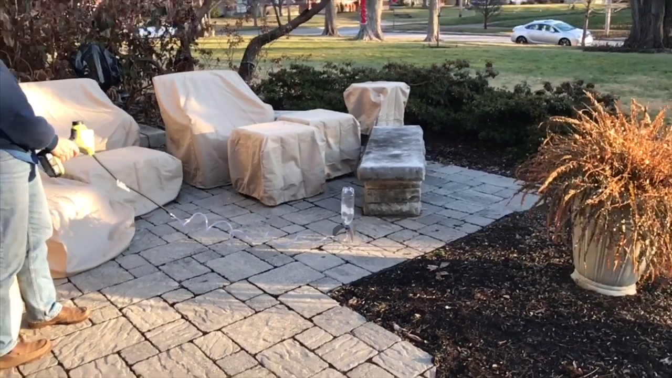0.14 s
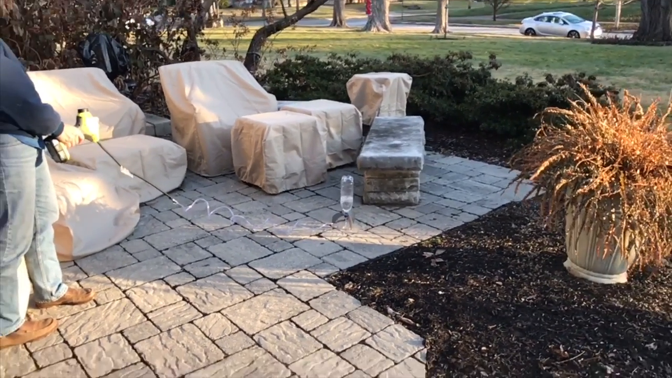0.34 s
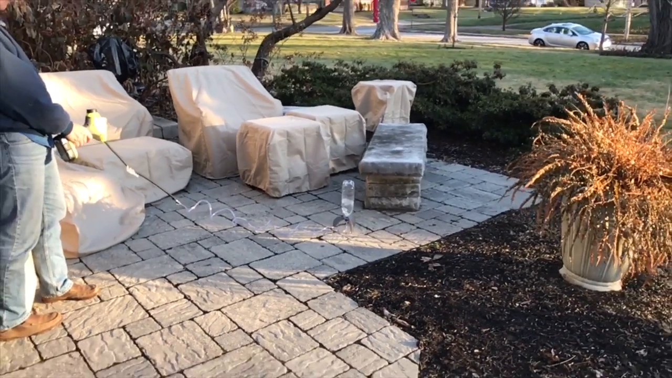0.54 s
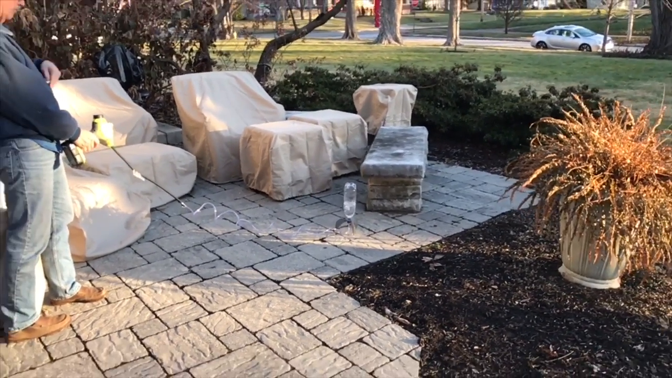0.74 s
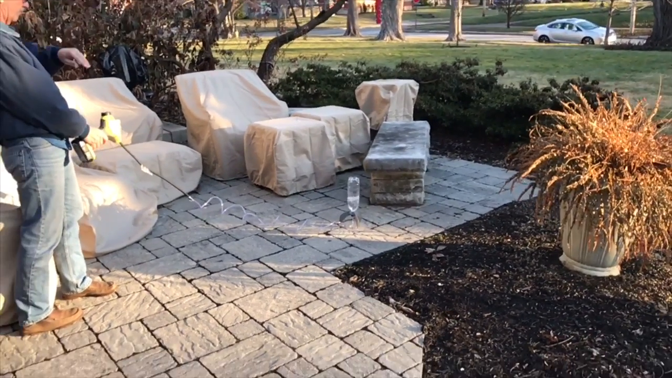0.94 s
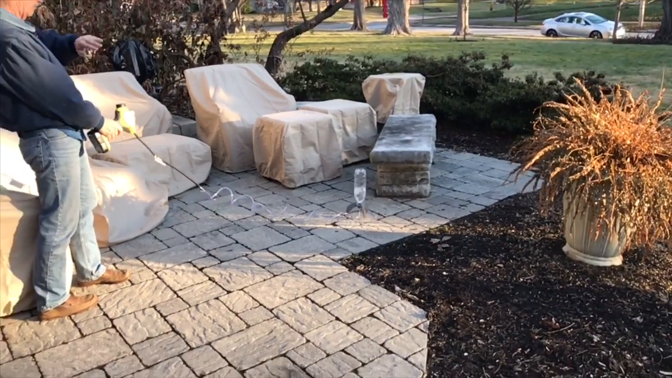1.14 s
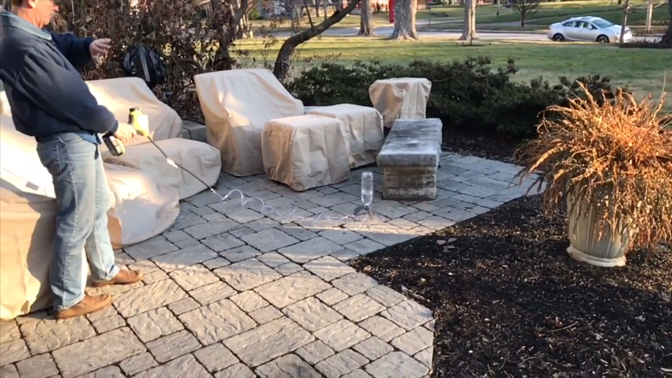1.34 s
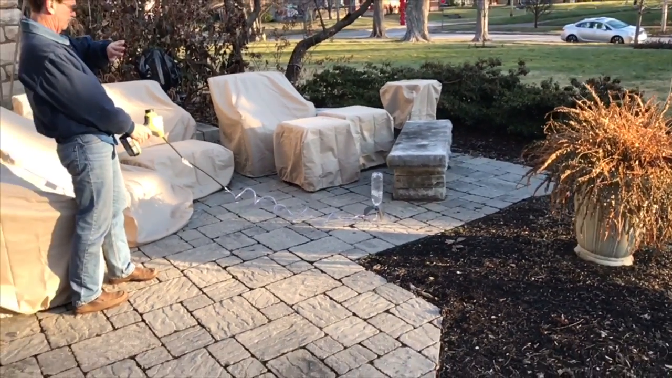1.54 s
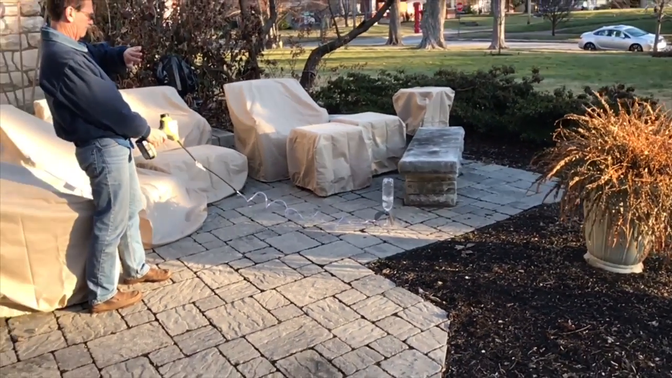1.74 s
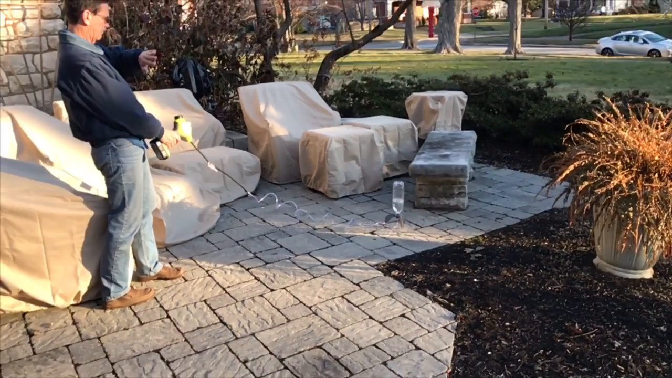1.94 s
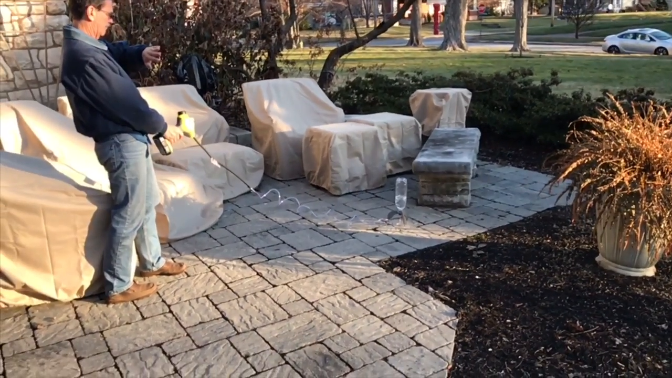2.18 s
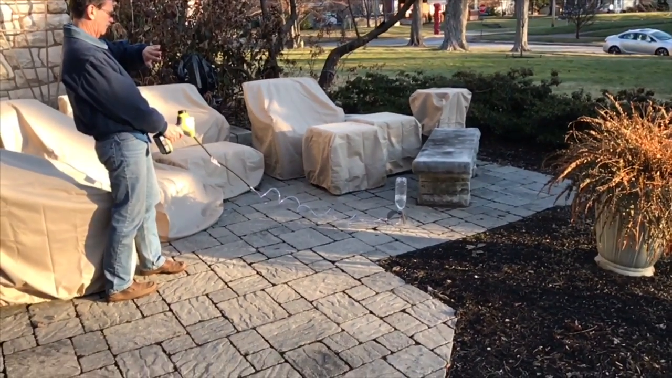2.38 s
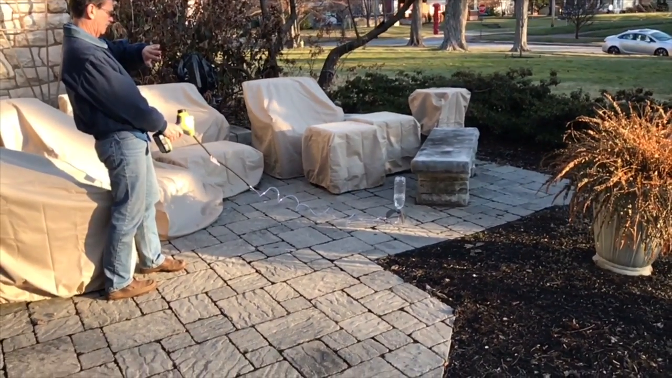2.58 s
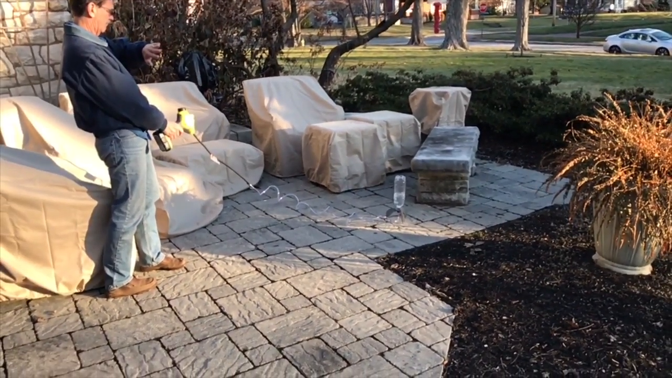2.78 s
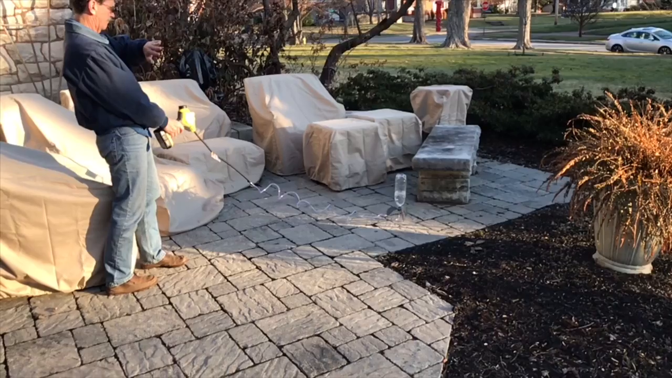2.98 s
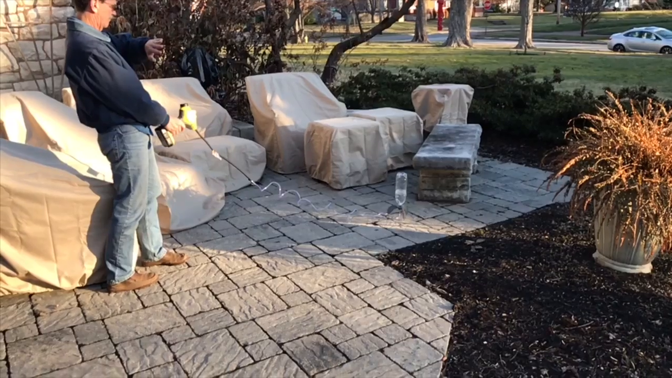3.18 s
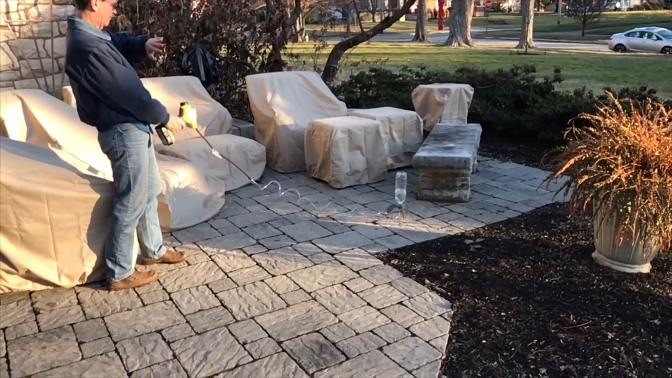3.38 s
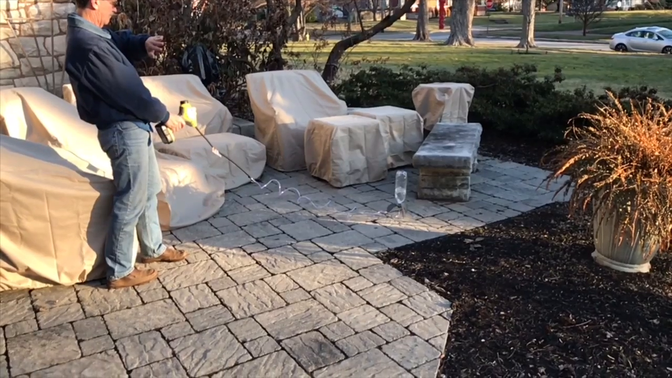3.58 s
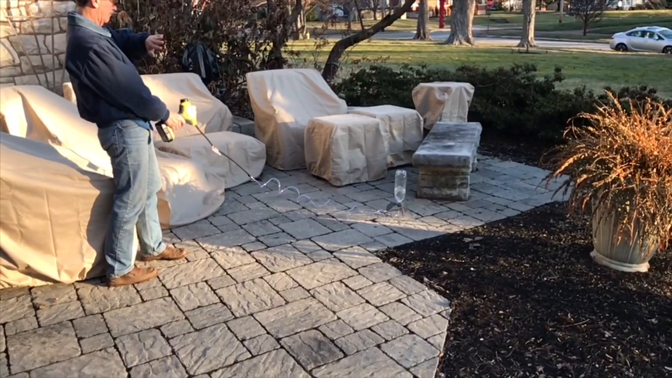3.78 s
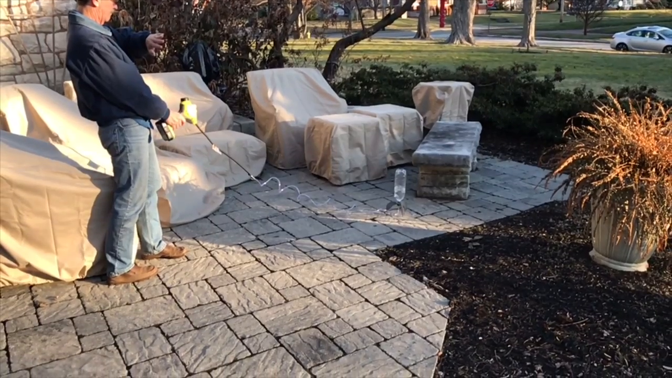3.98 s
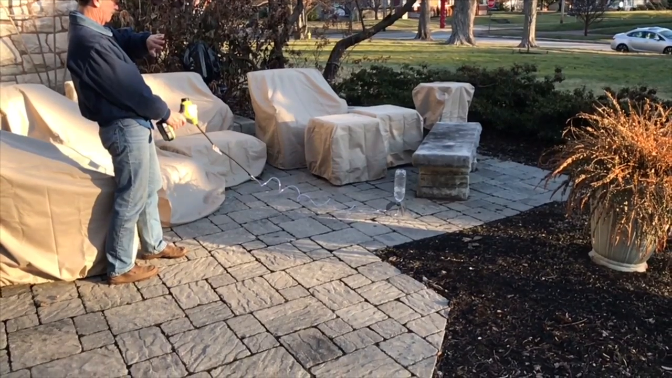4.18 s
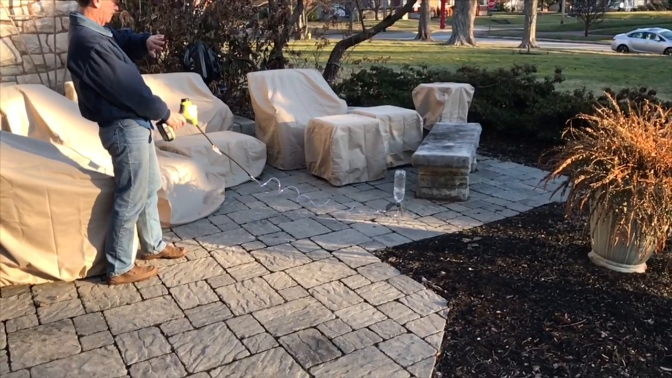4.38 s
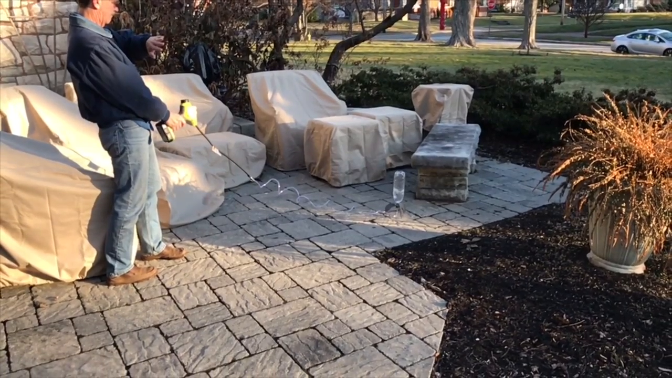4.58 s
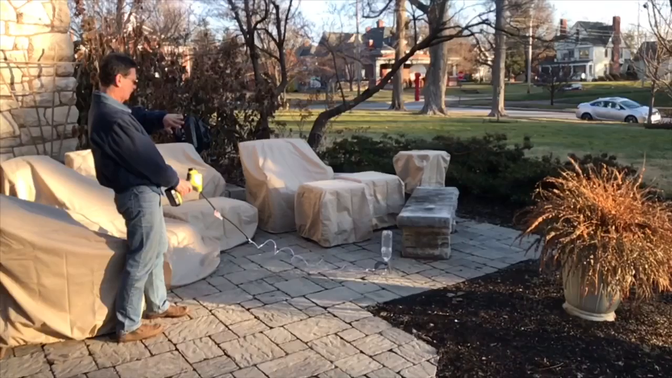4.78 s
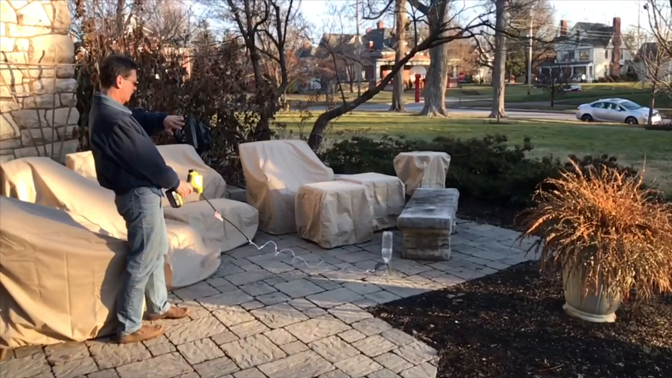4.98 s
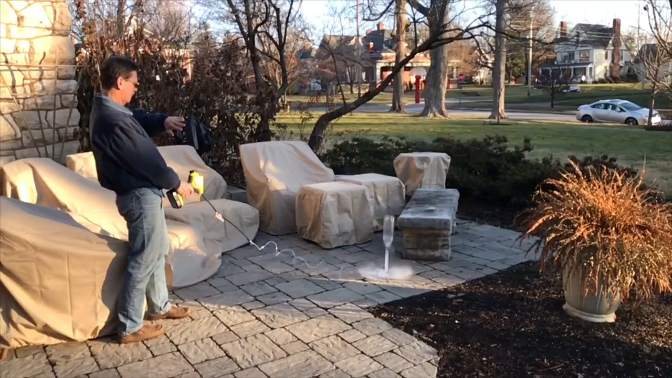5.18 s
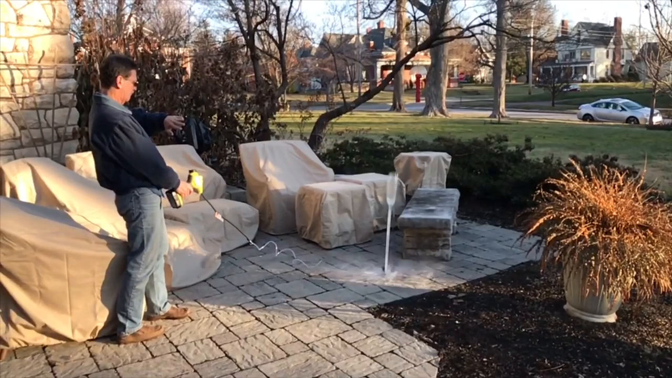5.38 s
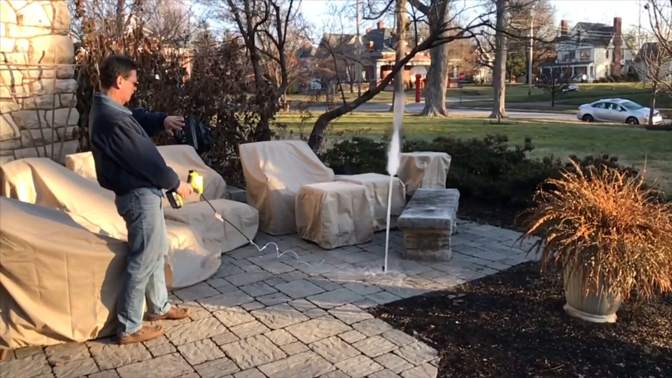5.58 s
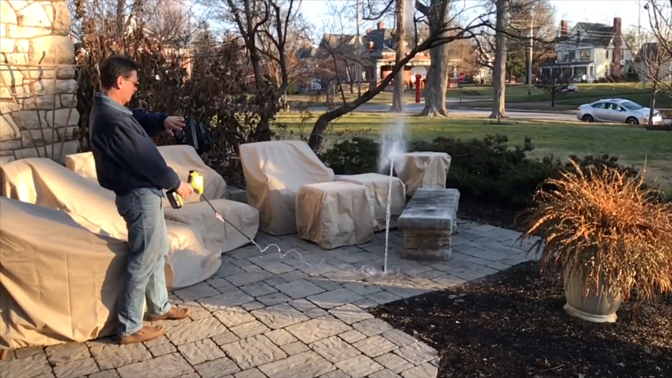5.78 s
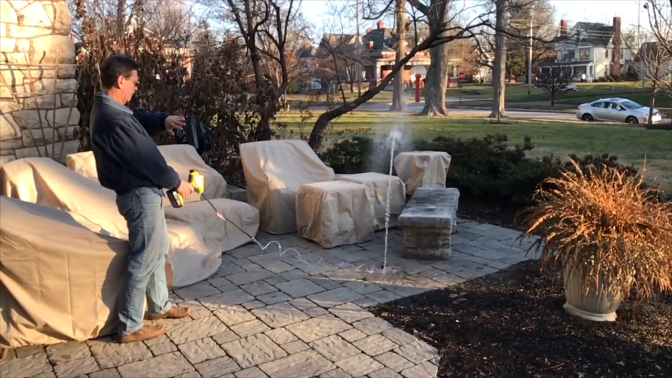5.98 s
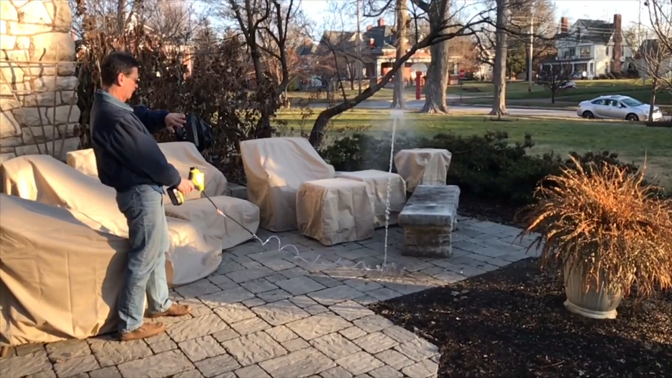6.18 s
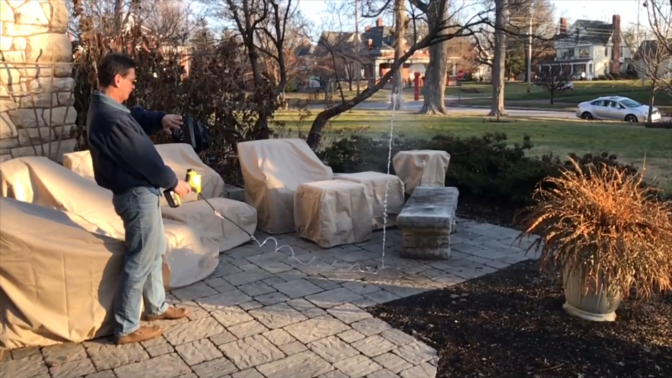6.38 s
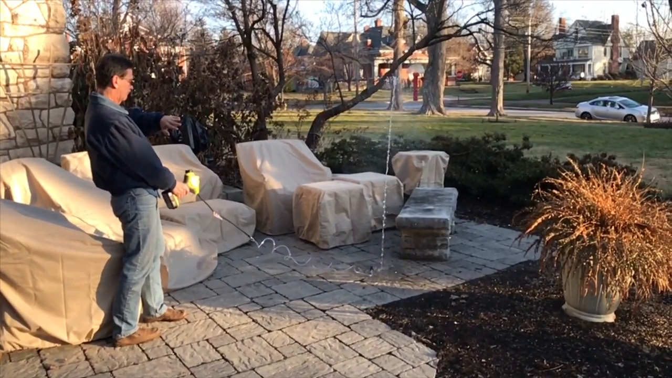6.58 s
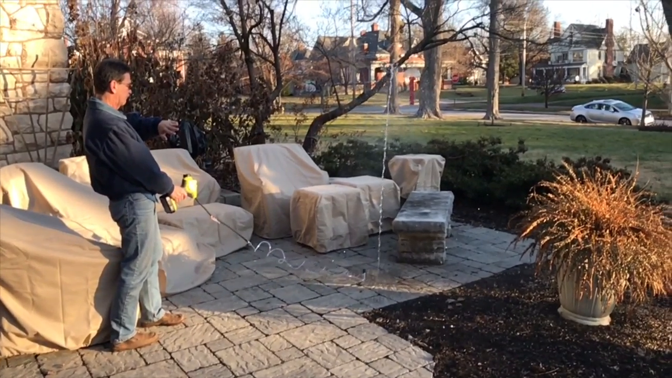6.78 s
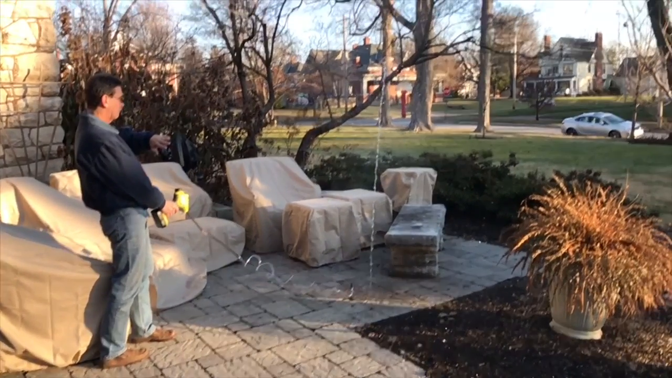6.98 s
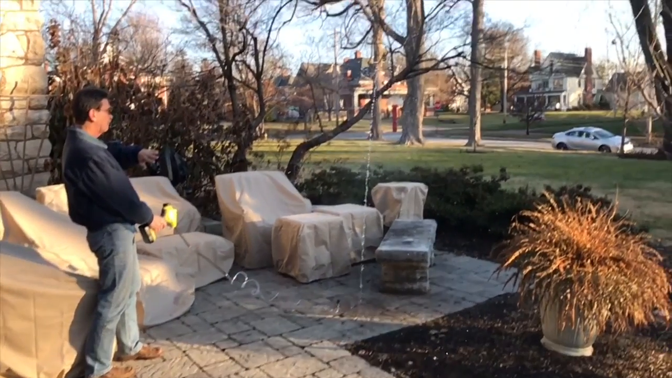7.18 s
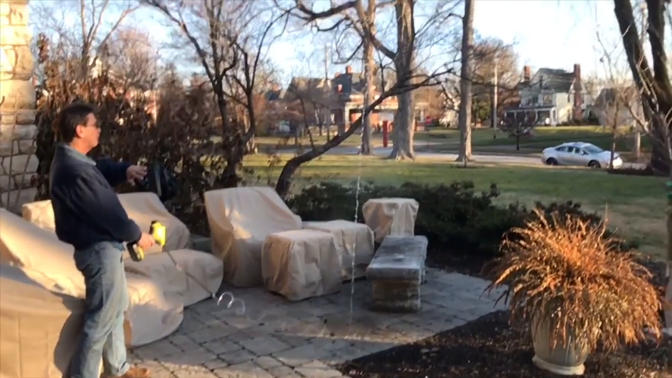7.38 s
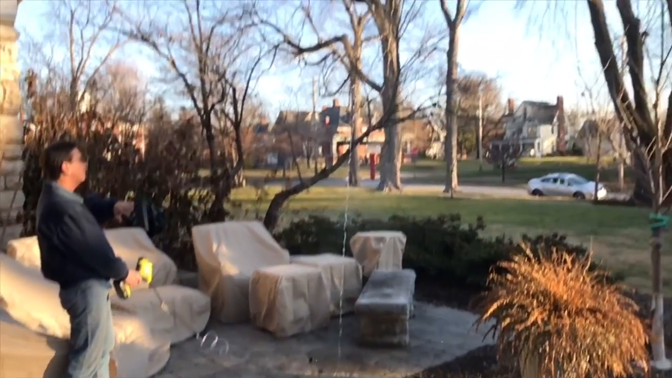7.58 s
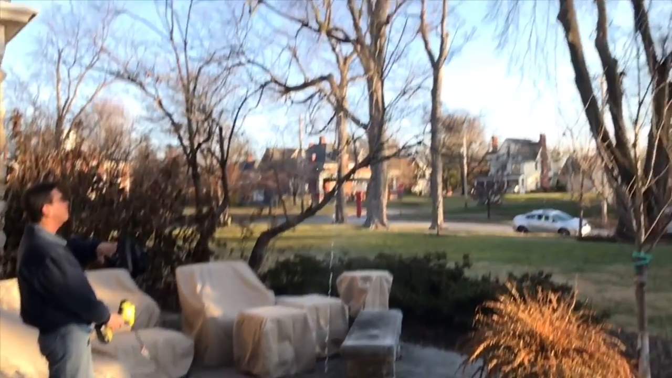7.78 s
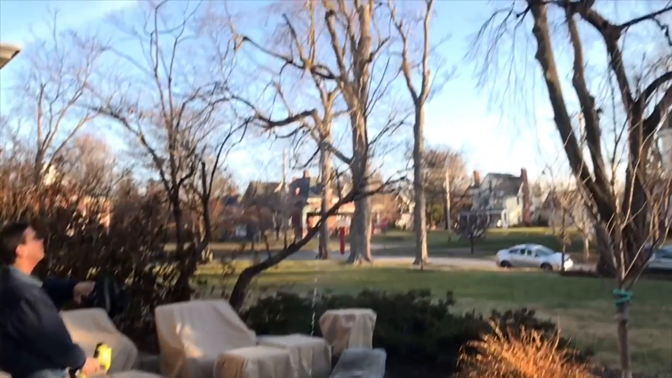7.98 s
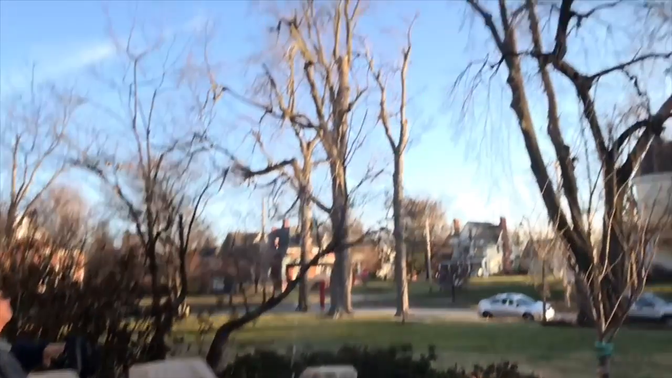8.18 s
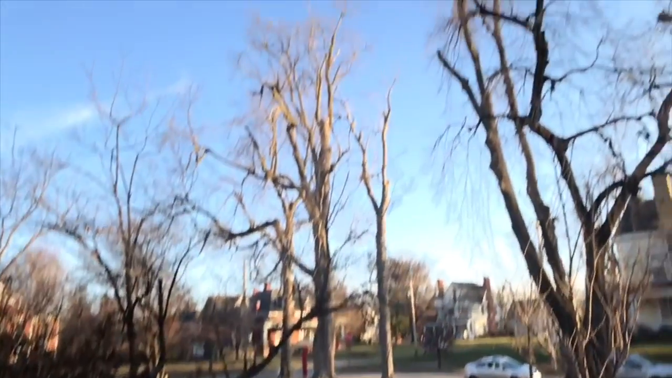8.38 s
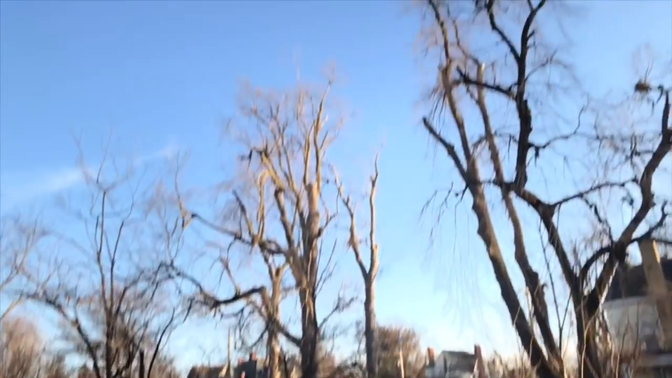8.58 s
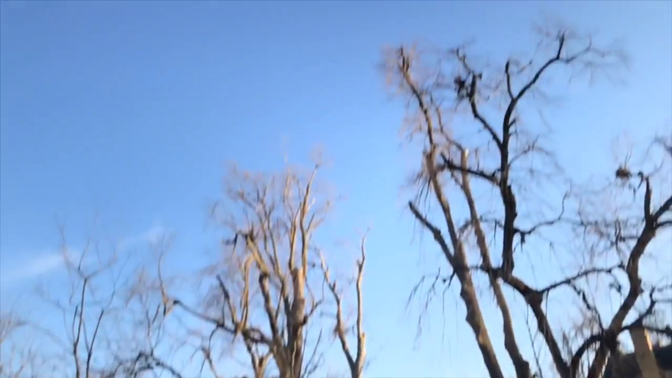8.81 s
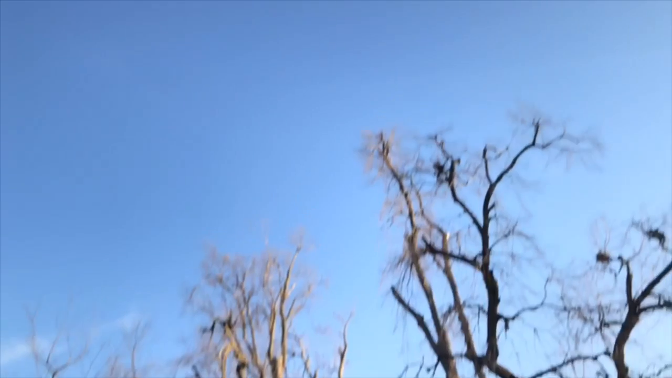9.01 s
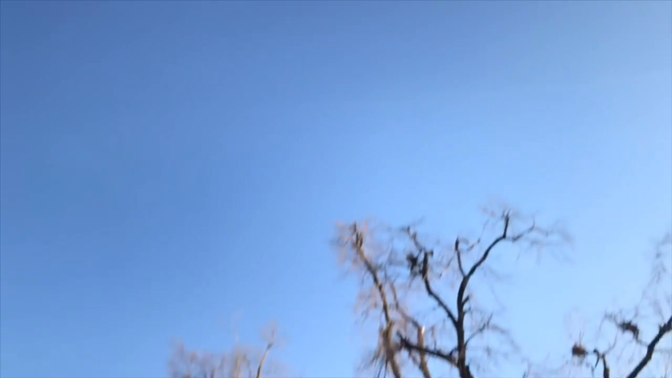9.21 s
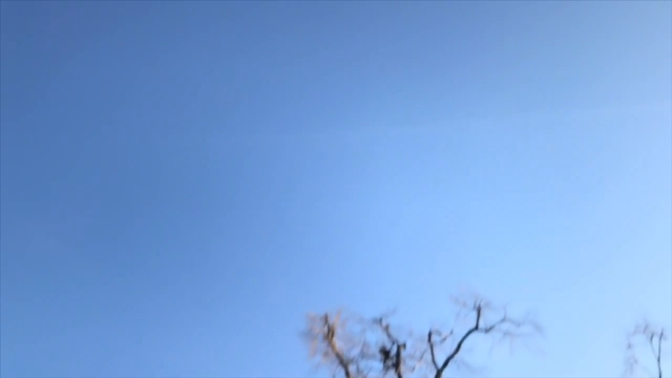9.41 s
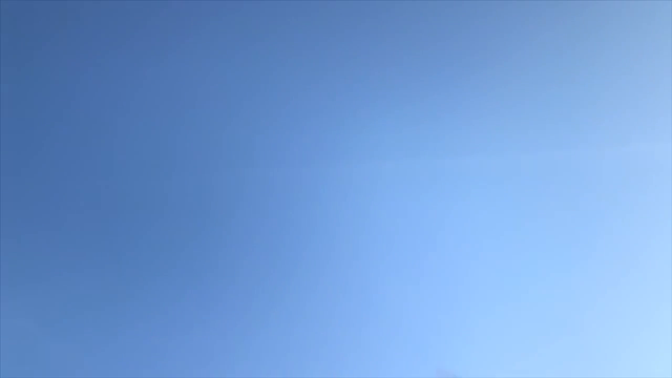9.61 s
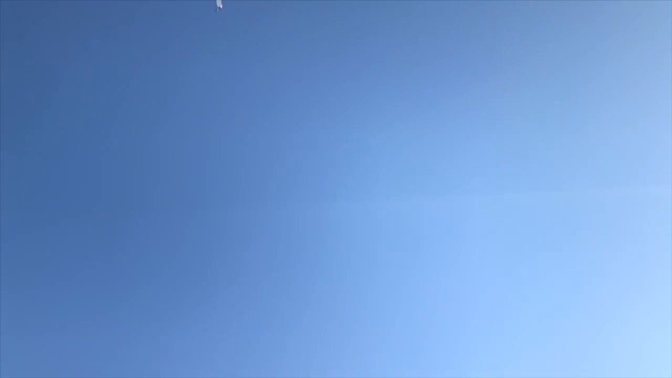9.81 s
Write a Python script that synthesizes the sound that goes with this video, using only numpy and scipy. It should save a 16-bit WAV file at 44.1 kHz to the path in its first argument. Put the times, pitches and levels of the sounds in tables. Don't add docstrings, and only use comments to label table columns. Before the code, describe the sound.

From 0 to about 1.75 seconds a hand-held piston air pump runs very near the microphone on an outdoor patio: a harsh, rapid rattling buzz at roughly sixty strokes a second, with metallic knocks, bright valve hiss and a thin reedy whistle; its tone turns duller around 1 second. Between 1.8 and 2.3 seconds playback brakes in tiny steps and everything slides down three octaves to a dark, grainy throb of about eight pulses a second, with a low strained whine. At 4.7 the sound dips briefly for a scene change, then the throb resumes. At 5.4 a bottle rocket releases in slow motion: abrupt deep pops and a loud muffled gush with spray, sagging by 5.8; a weaker sputter comes near 5.9 to 6.1, with faint late thuds to 6.8. The throb carries on, slowing and fading from 8.7 until 9.85.

```python
import sys
import numpy as np
from scipy import signal
from scipy.fft import rfft, irfft
from scipy.io import wavfile
from scipy.ndimage import uniform_filter1d, map_coordinates

SR = 44100
rng = np.random.default_rng(int(sys.argv[2]) if len(sys.argv) > 2 else 0)


def makeup_ratio(level_db):
    decades = np.asarray(level_db, float) / 20
    return 10 ** decades


def output_pcm(signal):
    pcm = np.clip(np.atleast_2d(signal).T, -1, 1) * 32767
    wavfile.write(sys.argv[1], SR, np.round(pcm).astype(np.int16))


N = 434385
M = 3 * SR + 4096

# (true pitch [Hz], width [Hz], knock level [dB],
# rush level [dB], crank angle of loudest rush [turns], rush swing [dB])
CASING_MODES = [(70, 110, -9.5, -23.5, 0.088, -17.5), (127, 15, -4.5, -23, 0.27, -7),
                (250, 110, -8.5, -25.5, .4, 14.5), (435.6, 50, -2, -19.5, 0.2, -2.5),
                (517, 44, 6.5, -6, .15, -4.5), (626, 59, -14.5, -19, .2, 5.5),
                (760, 160, -2.5, -15, .8, -4.5), (911, 170, 2.5, 0.5, .08, 0.5),
                (1275, 130, -1, 2, .03, -6), (1375, 150, -5.5, -2, .1, 4), (1605, 300, -5, 3, 0.18, 0),
                (2017, 220, -7.5, -5, .12, 3)]
# (.. [Hz, Hz, dB, dB, turns, dB])
HEAD_MODES = [(2435, 220, -7, -6.5, .1, 4.7), (2652, 330, -6.5, -2.5, .15, 1),
              (3150, 550, -9.5, -2.5, 0.87, 1), (4060, 560, -11, -2, 0.84, 1.7),
              (4700, 760, -15.5, -5.5, .2, 0.8), (6090, 800, -14.5, -5, .05, 1)]
# (.. [Hz, Hz, dB, dB, turns, dB])
VALVE_MODES = [(7110, 400, -17.5, -0.5, 0.14, 2.9), (8620, 560, -12, 3.5, 0.024, 3.7),
               (8794, 140, -13.5, -1, .02, 3.9), (9180, 350, -15, -6, 0.083, 3),
               (9810, 650, -21, -4, 0.1, 3), (11120, 250, -7, -2.5, .85, 4.6)]
# (.. [Hz, Hz, dB, dB, turns, dB])
VENT_MODES = [(11460, 530, -20, -5.5, 1, 2.2), (12760, 2200, -13.5, -1, 0.98, 0.8),
              (14890, 1900, -23.5, -8.5, 0.16, 2), (16160, 1200, -21, 0.5, 0, 2),
              (17820, 1000, -6.5, 2, 0.00015, 2.5)]
# (.. [Hz, Hz, dB, dB, turns, dB])
GEAR_MODES = [(5530, 200, -12, 0.91, 0.81, 7)]
# (level [dB], share of the distance loss [ratio], lean per grip tilt [dB per dB])
PART_LEVELS = [
    (-35.5, 1.1, 0),
    (-38, .8, 0.02),
    (-38, 0.89, 0.12),
    (-38.5, 0.92, -0.16),
]
# (time heard [s], speed [turns per true s])
CRANK_SPEED = [(0, 62.67), (1.1, 62.63), (1.75, 61.68), (2.3, 61.53), (4.68, 62.13), (4.69, 59.77),
               (5.5, 60.27), (6, 62.01), (6.9, 64.08), (8.6, 63.87), (8.95, 58.03), (9.85, 37.7)]
# (time heard [s], colour tilt about 1.3 kHz [dB per octave])
GRIP_TILT = [(0, 7), (.75, 8), (1.1, 0), (1.5, -2), (4.65, -2.5), (4.72, 0), (6.5, 0), (8.3, 4.5),
             (9.85, 0)]
# (time heard [s], level [dB])
CAMERA_AWAY = [(0, 0.5), (4.7, 1), (5.4, -1), (6, -1.5), (6.6, -1.5), (7.8, 0), (8.6, -0.5), (9, -4),
               (9.3, -7), (9.85, -12)]
# (true pitch [Hz], level [dB])
PATIO_AIR = [(30, -35), (50, -3), (120, -8.5), (300, -11.5), (1000, -12.5), (4000, -26.5), (18000, -29)]
# (time heard [s], gush level [dB], spray level [dB], attack [heard s], hold [heard
# s]) with attack and hold on the same slowed clock as the time heard
WATER_SURGES = [(5.434, -21.5, -26, 0.0026, 0.039), (5.482, -19.5, -24, 0.0012, .085),
                (5.62, -29.5, -33.5, .02, .06), (5.72, -28.5, -33.5, .015, .05),
                (5.907, -29.5, -35.5, 0.025, 0.059), (5.965, -23.5, -32.5, .025, 0.054),
                (6.036, -35, -28, .02, 0.027)]
# (true pitch [Hz], level [dB])
GUSH_COLOUR = [(120, -18.5), (300, -7.5), (700, -5), (1300, 2), (2000, -6), (2900, -3), (4200, -7.5),
               (6000, -34)]
# (true pitch [Hz], level [dB])
SPRAY_COLOUR = [(2500, -19.5), (4500, -5.5), (8000, -3.5), (10500, -8.5), (12500, -4), (18500, -8.5)]
# (time heard [s], level [dB], true pitch [Hz], 60 dB decay [true ms], push +1 or pull -1 first [sign])
AIR_SLUGS = [(5.4405, 1, 800, 6, 1), (5.4612, 5, 1150, 7, -1), (5.4811, 0, 1430, 5, -1),
             (5.4885, -2, 3000, 3, 1), (5.5222, -1, 1400, 5, -1), (5.551, -6, 1400, 6, -1),
             (5.9143, -8, 1600, 4, 1), (5.923, -8, 1400, 6, -1), (6.0258, -5, 1600, 4, -1),
             (5.455, -19, 300, 40, -1), (5.4885, -10, 13000, 1, 1), (5.897, -14, 2500, 3, 1),
             (5.748, -12, 1200, 6, 1), (6.085, -17, 72, 80, -1), (6.205, -24, 250, 20, 1),
             (6.674, -16, 9000, 1.5, 1), (6.72, -25, 1400, 30, 1), (6.77, -24, 1500, 12, 1)]

CRANK_HZ = 62.5
START_TURNS, EDIT_SKIP_TURNS = .03, -.1
EDIT_S, EDIT_HALF_S = 4.683, .03
BRAKE_S, FRAME_S, SLOW, EASE_LAG_FRAMES, EASE_FRAMES = 1.762, 1 / 30, 8, .4, 15.9
MICROPHONE_TOP_HZ, EXPORT_TOP_HZ = 18460, 15680
AIR_DB = -49
COLD_HEAD_DB, SEAT_S = 4, 0.392
GEAR_IDLE_DB, GEAR_STRAINED_DB, GEAR_LATE_DB, STRAIN_FROM_S, STRAIN_FULL_S = -47.5, -40.5, -48.5, 1.63, 2.1
REED_SLACK_HZ, REED_TIGHT_HZ, REED_LATE_HZ, TIGHTEN_FROM_S, TIGHTEN_TO_S = 5477, 5720, 5700, .85, 1.25
REED_DB, REED_LATE_DB, REED_CREEP_HZ_S = -49, -57.5, 70.1
SAG_DB_S, RELEASE_DB_S, STREAM_DB, STREAM_DB_S = 34, 169.5, -8, 27
SPLASH_DB, SPLASH_S = 8.5, .008


def level(x, db):
    return x * makeup_ratio(db) / np.sqrt(np.mean(x ** 2))


def ring(x, hz, width):
    return signal.lfilter(*signal.iirpeak(hz, hz / width, SR), x)


def walk(rate):
    k = int(SR / rate)
    steps = np.repeat(rng.standard_normal(M // k + 1), k)
    return 1.3 * uniform_filter1d(uniform_filter1d(steps, k), k)[:M]


def coloured(x, points):
    hz, db = np.transpose(points)
    f = np.arange(M // 2 + 1) * SR / M
    gain = makeup_ratio(np.interp(np.log(f + 1), np.log(hz), db, left=-60))
    return level(irfft(rfft(x) * gain, M), 0)


def true_time():
    frame = (np.arange(N) / SR - BRAKE_S) // FRAME_S
    u = np.clip((frame - EASE_LAG_FRAMES) / EASE_FRAMES, 0, 1)
    speed = SLOW ** -(u * u * (3 - 2 * u))
    return np.cumsum(speed) / SR


def knocks(turns, scatter_db, jitter):
    chance = rng.standard_normal((256, 2))
    whole = np.arange(1, int(turns[-1]))
    at = np.interp(whole + jitter * chance[whole, 0], turns, np.arange(M - 1))
    size = makeup_ratio(scatter_db * chance[whole, 1]) * np.sqrt(SR / CRANK_HZ)
    out = np.zeros(M)
    out[at.astype(int)] += size * (1 - at % 1)
    out[at.astype(int) + 1] += size * (at % 1)
    return out


def clatter(turns, hold_turns):
    steps = int(SR / CRANK_HZ)
    patterns = rng.standard_normal((64, steps))
    where = [(turns + 4) / hold_turns, turns % 1 * steps]
    return level(map_coordinates(patterns, where, order=1, mode="grid-wrap"), 0)


def pump_part(modes, turns, scatter_db, jitter, flicker_db, repeat, tilt_db=0, pivot_hz=1300):
    out = 0
    worn = np.sqrt(repeat) * clatter(turns, 14.0)
    for k, (hz, width, knock_db, rush_db, angle, swing_db) in enumerate(modes):
        stroke_db = swing_db * np.cos(2 * np.pi * (turns - angle))
        stroke_db = stroke_db + flicker_db * walk(250) + 0.34 * walk(4.8)
        rush = worn + np.sqrt(1 - repeat) * rng.standard_normal(M)
        drive = makeup_ratio(rush_db + stroke_db) * rush
        drive = drive + (-1) ** k * makeup_ratio(knock_db) * knocks(turns[:-1] - angle, scatter_db, jitter)
        octaves = np.log2(hz / pivot_hz if hz > 650 else 1)
        drive = drive * makeup_ratio(tilt_db * octaves)
        out = out + ring(ring(drive, hz, 1.76 * width), hz, 1.76 * width)
    return level(out, 0)


def reed(heard, turns, late, away_db):
    tight_hz = np.interp(heard, [TIGHTEN_FROM_S, TIGHTEN_TO_S], [REED_SLACK_HZ, REED_TIGHT_HZ])
    creep_hz = REED_CREEP_HZ_S * np.maximum(heard - BRAKE_S, 0)
    hz = np.where(late, REED_LATE_HZ, tight_hz + creep_hz)
    phase = 2 * np.pi * np.cumsum(hz * (1 + 0.0065 * walk(120))) / SR
    stroke_db = 5.0 * np.cos(2 * np.pi * (turns - .97)) + 2.7 * walk(90)
    return makeup_ratio(np.where(late, REED_LATE_DB + away_db, REED_DB) + stroke_db) * np.sin(phase)


def pump(heard):
    late = heard > EDIT_S
    turns = np.cumsum(np.interp(heard, *np.transpose(CRANK_SPEED))) / SR
    turns = turns + START_TURNS + EDIT_SKIP_TURNS * late
    away_db = np.interp(heard, *np.transpose(CAMERA_AWAY))
    grip_db = np.interp(heard, *np.transpose(GRIP_TILT))
    casing, head, valve, vent = (makeup_ratio(db + share * away_db + lean * grip_db) for db, share, lean in PART_LEVELS)
    head = head * makeup_ratio(COLD_HEAD_DB * np.exp(-heard / SEAT_S))
    strain_db = np.interp(heard, [STRAIN_FROM_S, STRAIN_FULL_S], [GEAR_IDLE_DB, GEAR_STRAINED_DB])
    gear = makeup_ratio(np.where(late, GEAR_LATE_DB + away_db, strain_db))
    vent_tilt_db = 2.2 * np.maximum(-grip_db, 0)
    out = casing * pump_part(CASING_MODES, turns, 1.1, 0.0028, 1.5, 0.53, grip_db)
    out = out + head * pump_part(HEAD_MODES, turns, 1.8, .004, 1.3, .45)
    out = out + valve * pump_part(VALVE_MODES, turns, 3.0, 0.012, 1.5, .2)
    out = out + vent * pump_part(VENT_MODES, turns, 3.5, 0.018, 1.8, 0.11, vent_tilt_db, 17000)
    out = out + gear * pump_part(GEAR_MODES, turns, 2.1, 0.016, 1.3, 0.49)
    return out + reed(heard, turns, late, away_db)


def patio_air():
    return makeup_ratio(AIR_DB + 3.4 * walk(3.3)) * coloured(rng.standard_normal(M), PATIO_AIR)


def surges(heard):
    gush, spray = 0, 0
    for at, gush_db, spray_db, attack, hold in WATER_SURGES:
        t = np.maximum(heard - at, 0)
        after = np.maximum(t - hold, 0)
        burst = makeup_ratio(-SAG_DB_S * t - RELEASE_DB_S * after)
        stream = makeup_ratio(STREAM_DB - STREAM_DB_S * after)
        shape = (1 - np.exp(-t / attack)) * (burst + stream)
        gush = gush + (makeup_ratio(gush_db) * shape) ** 2
        spray = spray + (makeup_ratio(spray_db + SPLASH_DB * np.exp(-t / SPLASH_S)) * shape) ** 2
    return np.sqrt(gush), np.sqrt(spray)


def air_slugs(heard):
    out = 0
    for at, db, hz, t60, push in AIR_SLUGS:
        start = np.interp(at, heard, np.arange(M))
        t = np.maximum(np.arange(M) - start, 0) / SR
        onset = np.minimum(4 / 3 * hz * t, 1)
        out = out + np.sign(push) * makeup_ratio(db - 60000 * t / t60) * np.sin(2 * np.pi * hz * t) * onset
    return out


def rocket(heard):
    gush_gain, spray_gain = surges(heard)
    gush = coloured(makeup_ratio(2.1 * walk(900)) * rng.standard_normal(M), GUSH_COLOUR)
    spray = coloured(makeup_ratio(1.1 * walk(1800)) * rng.standard_normal(M), SPRAY_COLOUR)
    return gush_gain * gush + spray_gain * spray + air_slugs(heard)


def slow_motion(tape, true_s):
    spectrum = rfft(tape) * (np.arange(M // 2 + 1) * SR / M < MICROPHONE_TOP_HZ)
    fine = irfft(spectrum, SLOW * M) * SLOW
    return map_coordinates(fine, [true_s * SR * SLOW], order=3)


def scene():
    true_s = true_time()
    heard = np.interp(np.arange(M) / SR, true_s, np.arange(N) / SR)
    return slow_motion(pump(heard) + rocket(heard) + patio_air(), true_s)[None]


def band_limit(x):
    return signal.sosfilt(signal.butter(12, 17100, fs=SR, output="sos"), x)


def record(dry):
    fade = np.clip(abs(np.arange(N) / SR - EDIT_S) / EDIT_HALF_S, .05, 1)
    fade = fade * np.minimum(np.arange(N)[::-1] / 256, 1)
    low_pass = signal.ellip(12, .2, 90, EXPORT_TOP_HZ, fs=SR, output="sos")
    mix = signal.sosfilt(low_pass, dry * fade)
    return band_limit(mix)


dry = scene()
out = record(dry)
output_pcm(out)
```